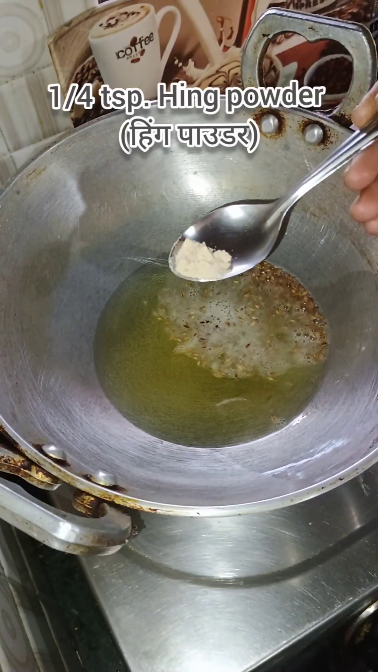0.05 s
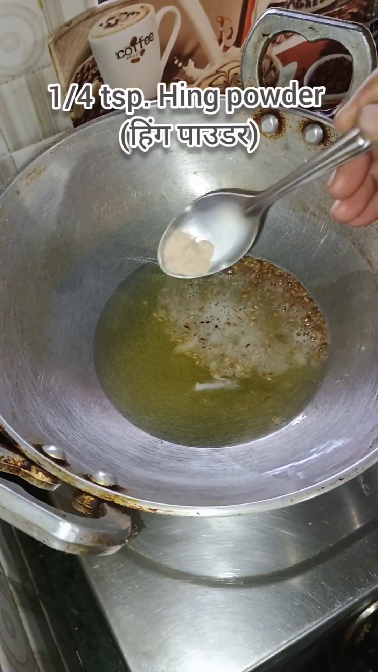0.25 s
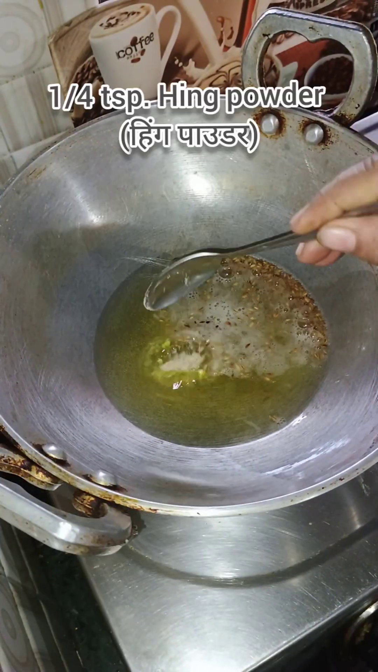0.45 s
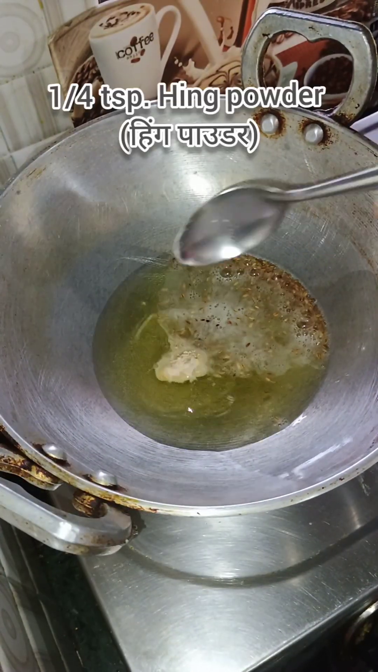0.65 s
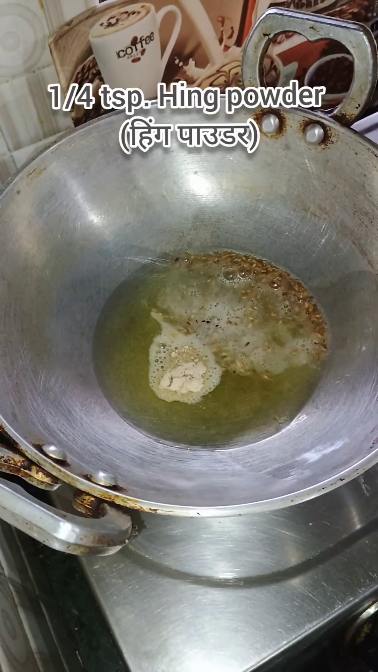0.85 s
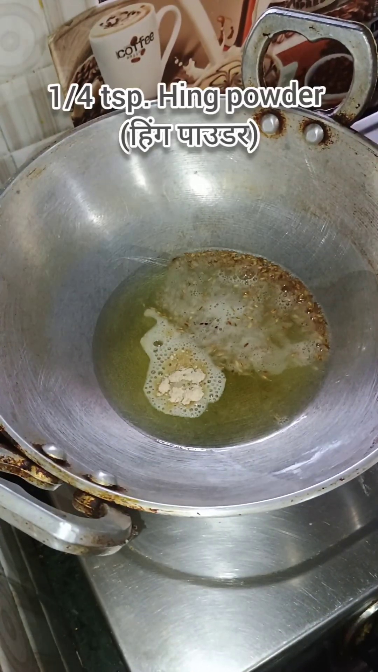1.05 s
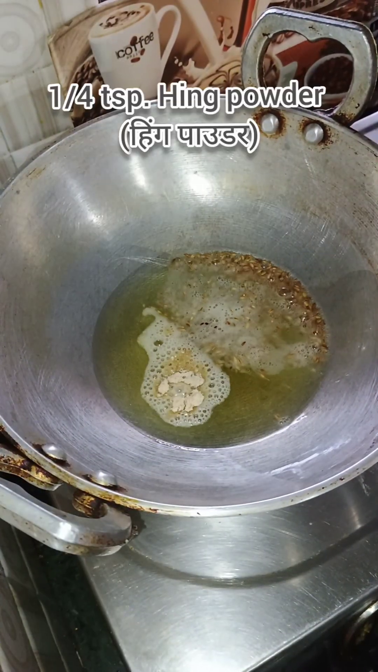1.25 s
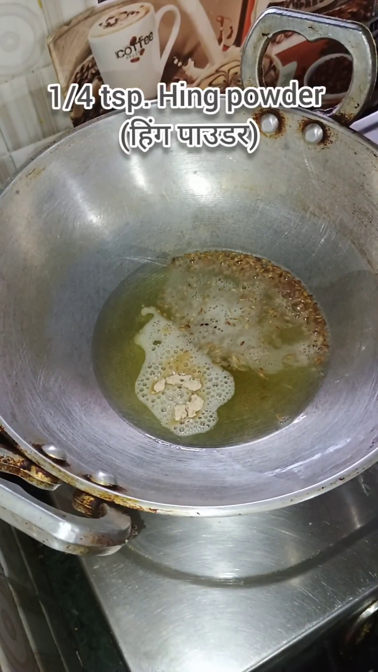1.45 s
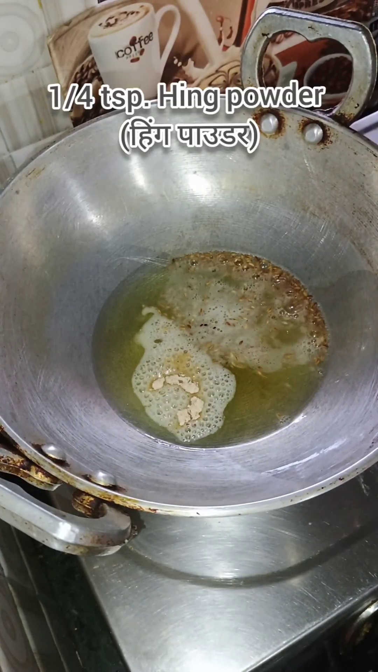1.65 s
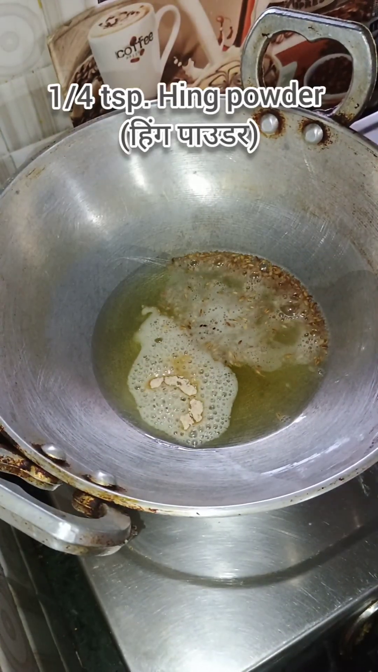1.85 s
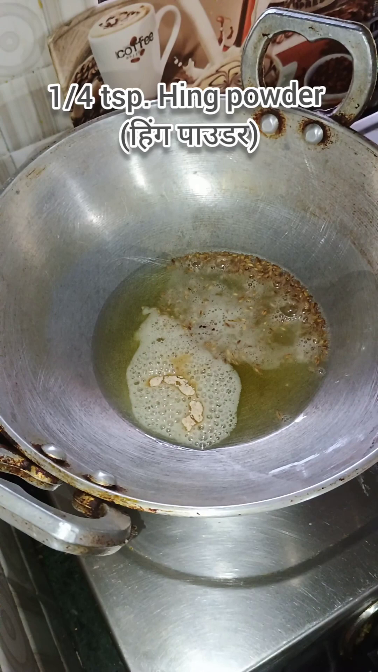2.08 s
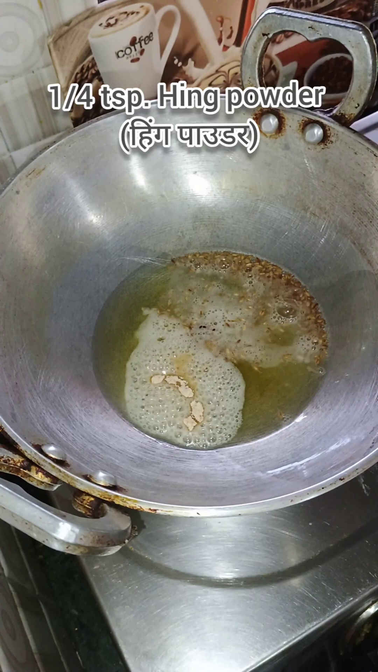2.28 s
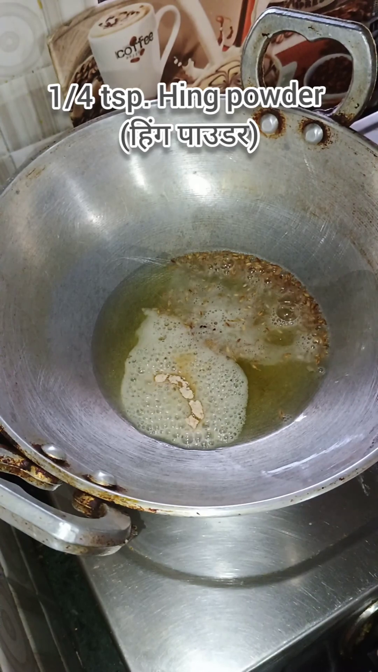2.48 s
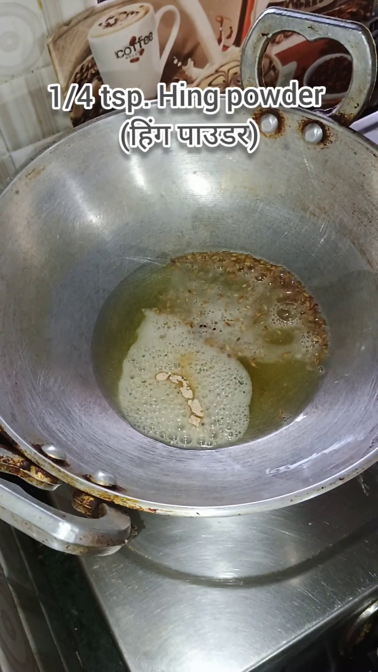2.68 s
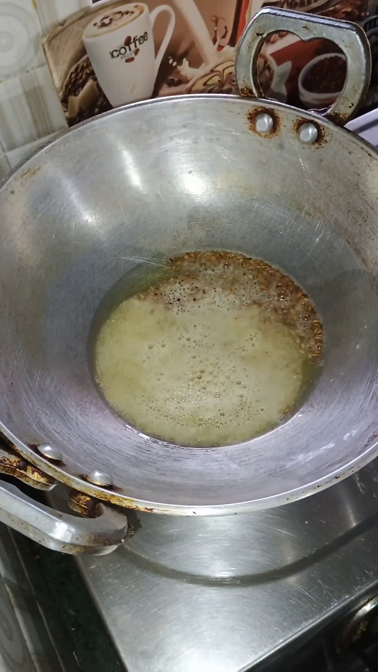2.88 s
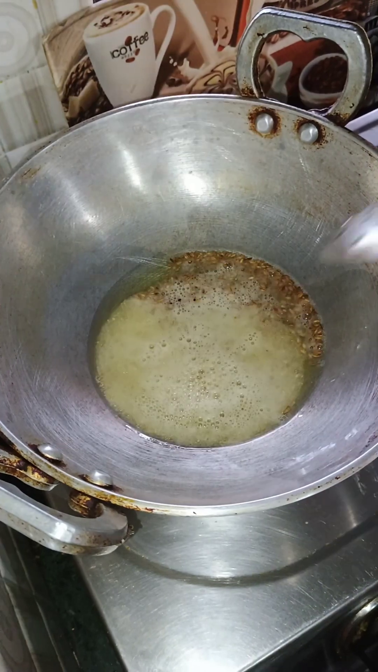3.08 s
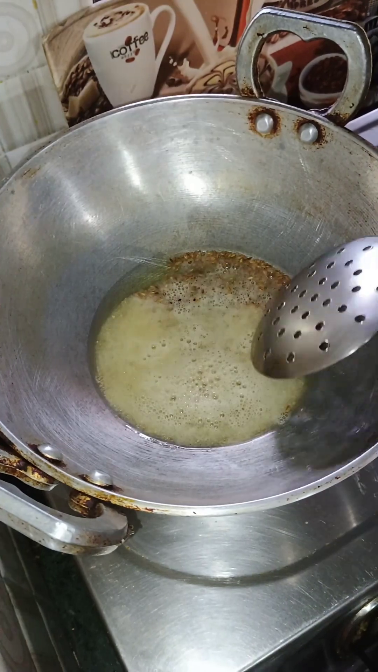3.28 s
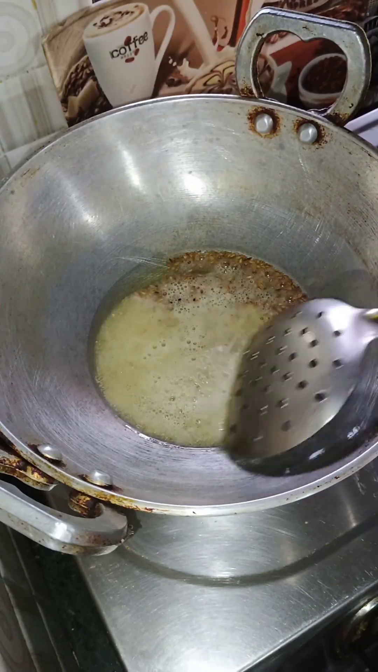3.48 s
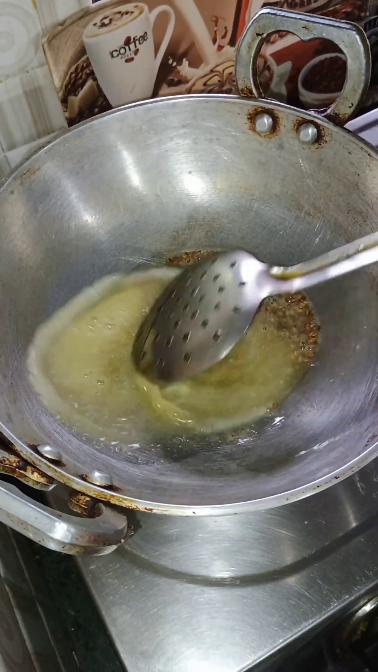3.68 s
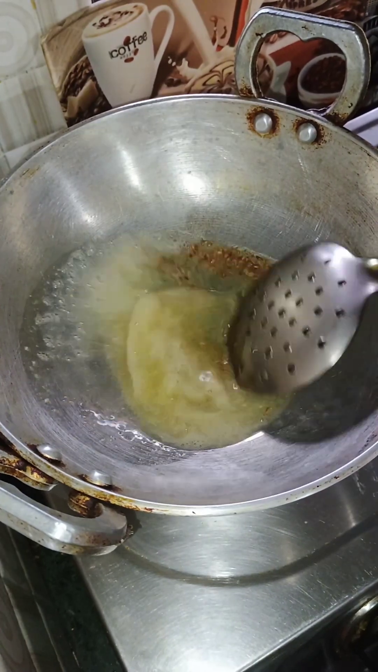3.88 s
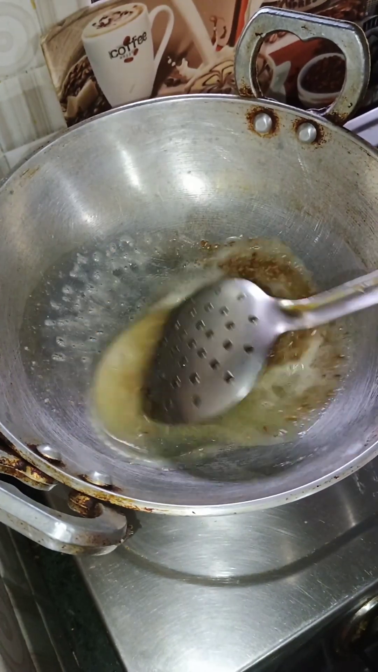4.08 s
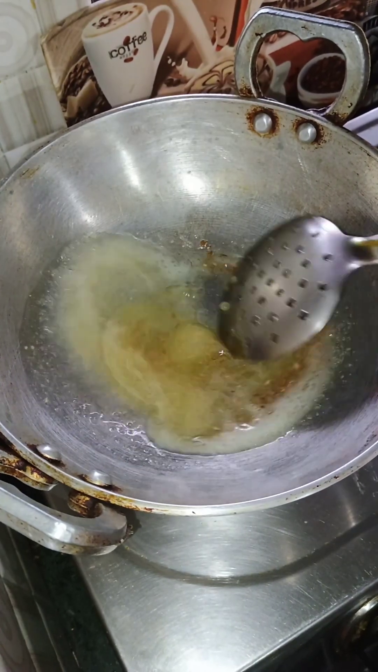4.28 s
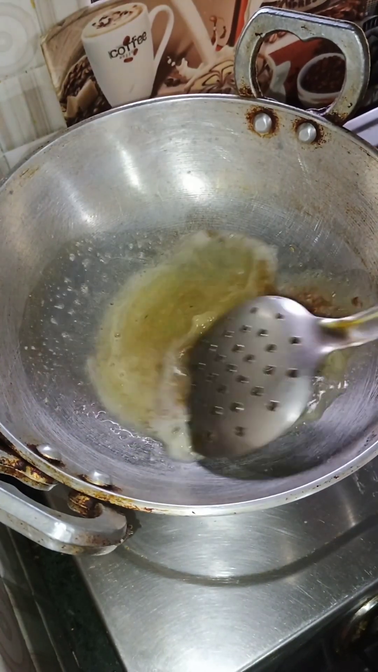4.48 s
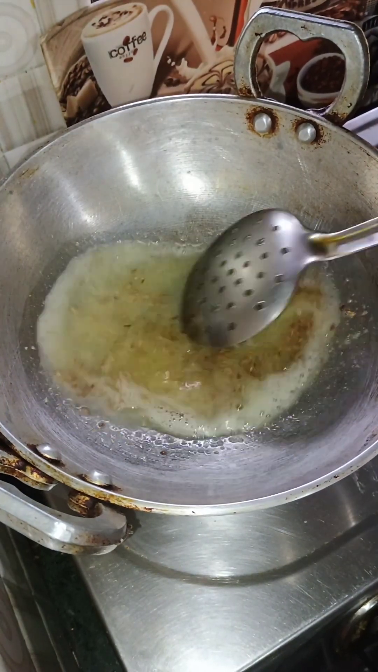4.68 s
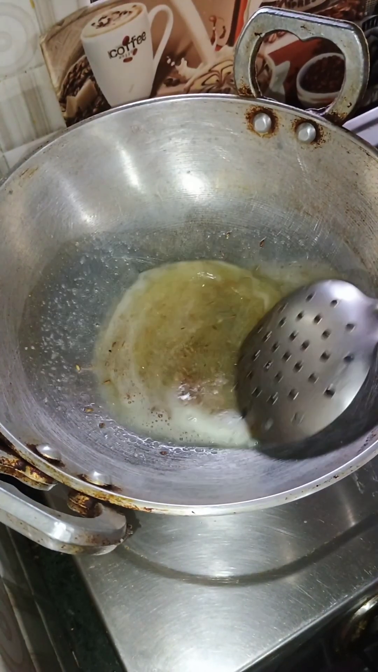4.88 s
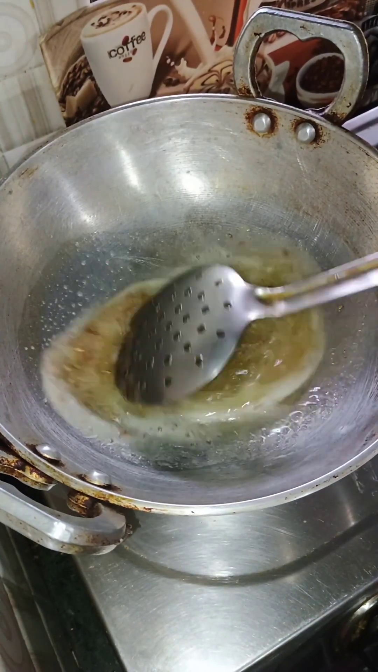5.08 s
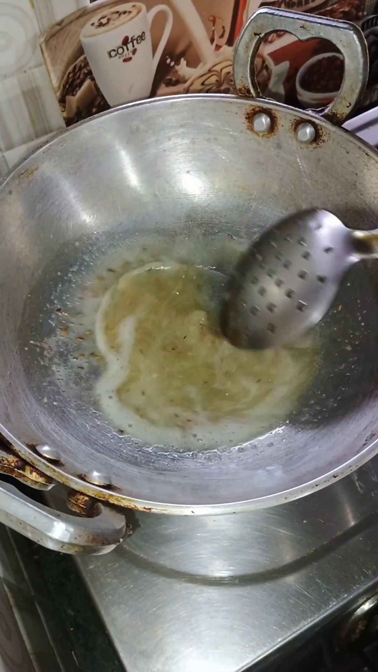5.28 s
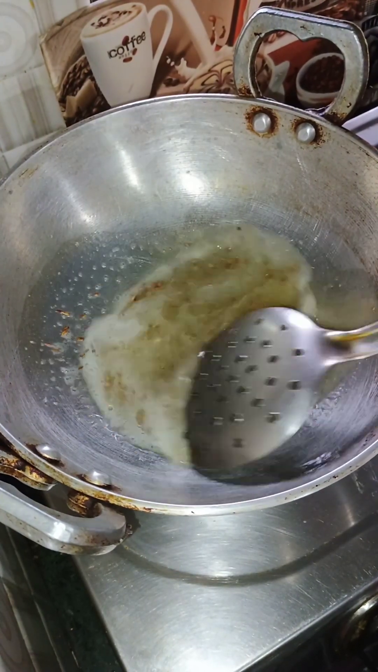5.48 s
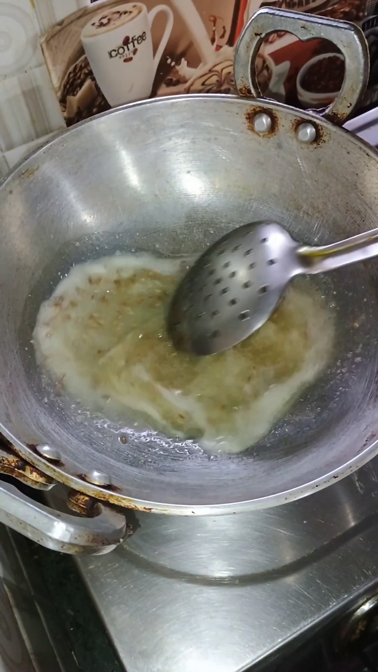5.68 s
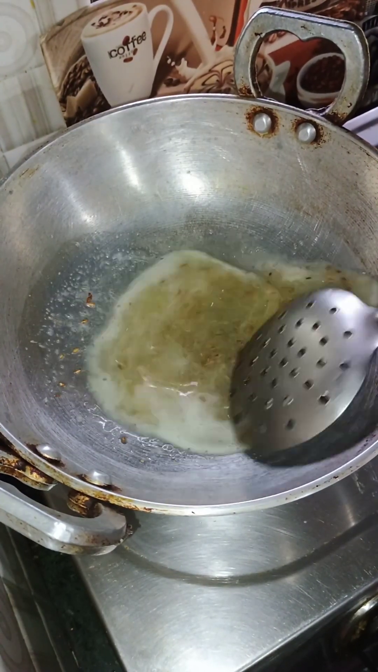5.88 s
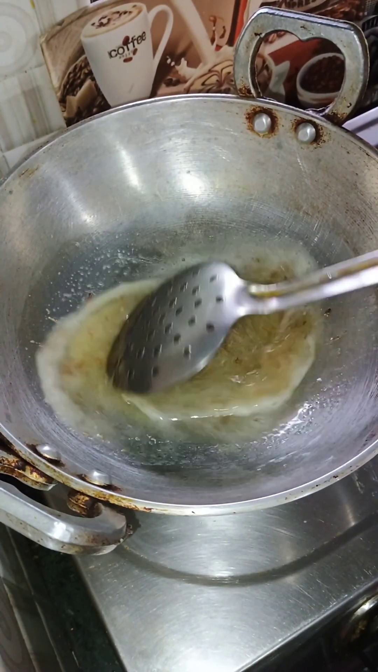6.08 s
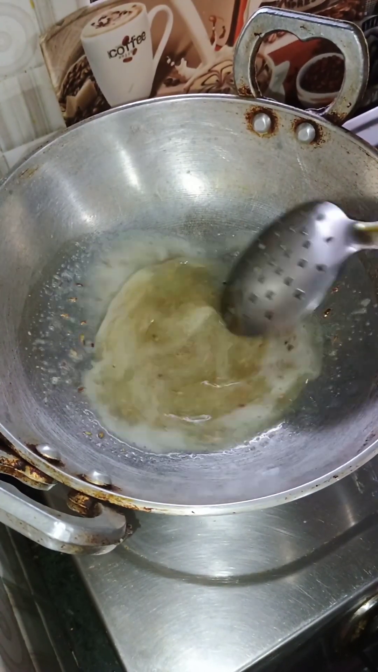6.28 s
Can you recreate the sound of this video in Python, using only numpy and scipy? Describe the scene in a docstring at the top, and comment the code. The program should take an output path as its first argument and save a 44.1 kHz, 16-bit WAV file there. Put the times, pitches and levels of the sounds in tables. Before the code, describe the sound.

Close, quiet foam fizz with sharp oil pops, a brief clatter, then loud crackling sizzle as a metal spoon strikes, rasps and squeaks around a wok.

```python
"""Spices fry in hot oil in a metal wok, close to the microphone in a small, faintly humming kitchen.
At first the foam fizzes: random bubble pings over a hiss. A teaspoon ticks, droplets spit as short pings
with echoes, something shuffles, and utensils clatter down as hollow thuds, noisy clacks and ringing steel.
Then a slotted steel spoon strikes and scrapes the wok: noise bursts and stick-slip jolts ring its
resonances, the edge rasps and squeaks, and the stirred oil sizzles loudly in flaring clumps of bubbles."""
import sys
import numpy as np
from scipy import signal
from scipy.fft import rfft, irfft, next_fast_len
from scipy.io import wavfile
from scipy.ndimage import map_coordinates

SR = 44100
rng = np.random.default_rng(int(sys.argv[2]) if len(sys.argv) > 2 else 0)


def bounce(signal):
    """Save signal as a 16-bit WAV file at the path given by the first command-line argument."""
    frames = np.transpose(np.atleast_2d(signal))
    limited = np.clip(frames, -1, 1)
    pcm = np.round(limited * 32767).astype(np.int16)
    wavfile.write(sys.argv[1], SR, pcm)


N = 279594

# fizz of the resting foam: (time [s], relative level [dB])
SIMMER = [(0.0, -49.5), (0.64, -49), (1.28, -48.5), (1.5, -48), (2.7, -46.5), (2.97, -49.5), (3.46, -51)]
# how much hot metal the stirred oil wets: (time [s], relative sizzle level [dB])
WETTING = [(3.52, -29), (3.55, -18), (3.58, -22.5), (3.83, -17), (3.97, -24), (4.25, -19), (4.33, -25.5),
           (4.52, -18.5), (4.65, -21), (4.74, -17.2), (4.86, -18.5), (4.91, -24), (5.03, -19),
           (5.54, -18.5), (5.59, -19.5), (6.04, -17), (6.27, -22.5), (6.32, -19.5)]
# short pings in the oil, mostly single water droplets bursting; one, at 2.803 s, is a faint bright clack of the
# utensils: (time [s], peak [dB], pitch [Hz], relative bubble body [dB])
POPS = [(1.0056, -23, 6630, -22), (1.1862, -29, 6820, -18), (1.355, -20, 8330, -39),
        (1.4202, -26, 11000, -40), (1.478, -22.5, 7540, 6.5), (1.515, -17.5, 7920, -25),
        (1.6126, -15.5, 6850, -28), (1.7834, -10, 6930, -34), (1.8415, -20.5, 6760, 0),
        (1.9764, -20, 6830, -26), (1.9898, -8, 9300, -26), (2.101, -22.5, 6940, 3.5),
        (2.2711, -7, 6280, -13), (2.2883, -19.5, 6790, 3), (2.3823, -15, 5970, -2), (2.396, -15, 8900, -4),
        (2.4845, -22, 6700, 7.5), (2.559, -19.5, 6600, -13), (2.5812, -20, 5930, -12),
        (2.6728, -30, 9370, -14), (2.7384, -18.5, 6900, -8), (2.803, -26, 4070, -9),
        (3.3482, -29, 6500, -20), (3.6762, -4.5, 5700, -11), (3.8928, -4.5, 4950, -15),
        (4.0238, -7.5, 4670, -10), (4.2436, -6.5, 6920, -21), (4.5144, -3, 5530, -15),
        (4.814, -9.5, 6690, -17), (4.8612, -7.5, 6620, -22), (5.0548, -5.5, 6920, -15),
        (5.688, -7.5, 7305, -16), (5.7707, -5, 6930, -10), (6.2267, -16, 6680, -8),
        (6.2542, -10, 5200, -27)]
# lesser droplets bursting at random: (start [s], end [s], rate [1/s], mean peak [dB])
SPITTING = [(0.998, 2.949, 12, -27.5), (3.592, 6.303, 4, -10.5)]
# the tick as the teaspoon leaves: (time [s], relative level [dB])
TEASPOON = [(0.768, -13.5)]
# utensils on the counter: (time [s], relative thud [dB], thud pitch [Hz], relative clack [dB])
KNOCKS = [(2.822, -41, 121, -26.5), (2.828, -18, 371, -28.5), (2.845, -24.5, 390, -29),
          (2.862, -22.5, 305, -40), (2.882, -26, 324, -37), (2.996, -25.5, 326, -63),
          (3.029, -34, 336, -52)]
# ringing steel of the utensils: (pitch [Hz], relative level [dB], t60 [s])
STEEL = [(495, 5.5, 2.6), (960, 17, 0.46), (1483, 13, 0.57), (1650, 2, 1.6), (2120, -2, .4)]
# a soft shuffle beside the stove: (time [s], relative level [dB], rise [s], fade [s])
SHUFFLE = [(1.328, -43, .022, 0.038)]
# faint hollow tones in the room: (centre [s], pitch [Hz], level [dB], half length [s])
SWELLS = [(0.96, 625, -64.5, .09), (1.497, 1000, -60.5, 0.11), (1.687, 602, -64.5, 0.19),
          (2.2, 440, -54.5, 0.095), (3.426, 452, -56.5, 0.11)]
# the spoon hits the wok: (time [s], relative level [dB])
HITS = [(3.49, -9), (3.953, -10.5), (4.302, -11.5), (4.459, -12), (4.678, -11.5), (5.026, -15.5),
        (5.163, -12.5), (5.246, -14.5), (5.33, -19), (5.469, -17), (5.675, -13), (5.729, -13.5),
        (5.915, -16), (5.962, -15), (6.145, -16.5), (6.199, -18.5)]
# the spoon's edge chatters: (time [s], relative level [dB], pitch [Hz])
SQUEAKS = [(3.904, -19, 2630), (4.1143, -12.5, 1770), (4.1944, -11, 2000), (4.7097, -8.5, 2040),
           (4.7214, -8.5, 2300), (4.78, -17, 1685), (4.9186, -16.5, 1660), (5.127, -11.5, 2710),
           (5.1422, -8.5, 2100), (5.1542, -8, 2080), (5.888, -7, 1660), (5.9178, -11.5, 2070),
           (6.2036, -7.5, 1730)]
# the spoon drags across the bottom: (time [s], length [s], relative boom [dB], groan [Hz])
DRAGS = [(3.495, 0.12, -35.5, 317.6), (3.595, .1, -31, 335), (4.047, 0.11, -31, 343),
         (4.353, 0.095, -39.5, 314), (4.555, 0.035, -32, 326.3), (5.017, 0.093, -36, 353),
         (5.351, .15, -36, 313.3), (5.672, 0.054, -41, 331), (5.928, .17, -38, 338.4)]
# the spoon sweeps up the wall: (time [s], length [s], relative rub [dB], relative edge rasp [dB], squeal [Hz])
SWEEPS = [(3.77, 0.1, -30, -25, 2307), (4.01, 0.14, -30.5, -24.5, 1799), (4.31, 0.12, -33, -29, 2100),
          (4.5, .11, -35.5, -26.5, 2330), (4.68, 0.12, -28.5, -24.5, 1972), (5.02, 0.054, -32, -23, 2510),
          (5.13, 0.15, -39.5, -26.5, 2132), (5.26, 0.1, -28, -25, 2176), (5.44, .06, -33, -30, 1994),
          (5.68, .16, -31.5, -27, 2064), (5.88, 0.16, -34, -30.5, 1823), (6.29, 0.048, -31.5, -29.5, 2450)]
# light contact between strokes: (boom [dB], rub [dB], rasp [dB]), relative
TOUCH_DB = (-44.5, -35, -32)
# the spoon is lifted: (start [s], end [s])
LIFTED_S = (4.89, 5.01)
# the pressing spoon sets off the wok's lowest note: (time [s], relative level [dB], rise [s], t60 [s])
HUM = [(4.38, -50.5, 0.026, 2.9)]
# resonances of the wok's bottom, wall and edge: (pitch [Hz], width [Hz], relative level [dB])
BELLY = [(146.6, 11.3, -14.5), (232, 60, -8), (287, 53, -4.5), (346.4, 4, 3), (399, 22, -3.5)]
WALL = [(524, 34, -1), (572, 8.8, 4), (742, 55, 0), (800, 51, -0.5), (908, 86, 1), (999, 42, 2),
        (1079, 33, -0.5), (1373, 97, 5), (1461, 57, 7)]
EDGE = [(1682, 85, 0), (1835, 80, 1), (2007, 81, -3), (2204, 66, 2), (2390, 140, -5.5), (2657, 320, -3),
        (3550, 100, -4), (4120, 260, -7)]
# spectra of the foam, the fine spray and the larger bubbles: (frequency [Hz], relative density [dB])
FIZZ = [(1500, -54), (2300, -26.5), (3300, -27), (4100, -20.5), (4800, -7), (6000, -7), (6800, -1.5),
        (7600, -8), (9500, -8), (12000, -14), (16000, -20)]
SPRAY = [(1500, -38.5), (4000, -9.5), (5400, -6), (5900, -3.5), (6750, 2), (7500, -6), (9500, -8),
         (12000, -13), (16000, -21)]
SPLUTTER = [(600, -35.5), (2000, -6.5), (3100, -6.5), (4100, -5.5), (4950, 1.5), (5500, -6.5), (6300, -9),
            (9000, -23), (16000, -38)]
# spectra of teaspoon, clacks, shuffle, spoon blows and room: (frequency [Hz], relative density [dB])
TICK = [(300, -30), (1000, -24), (2400, -10.5), (3700, -11.5), (5100, -5), (6000, -3.5), (6750, 2),
        (7600, -9), (9200, -8), (12000, -17), (16000, -27)]
CLACK = [(40, -23), (200, -6), (400, -2), (750, 1), (1150, -3), (1400, -8), (2500, -11.5), (4500, -16.5),
         (10000, -28)]
RUSTLE = [(100, -22), (300, 3), (450, -0.5), (600, -4), (760, 4), (950, -14), (1150, 1.5), (1400, -4.5),
          (2200, -6), (3000, -25), (6000, -50)]
BLOW = [(40, -41), (120, -9), (260, -25), (600, 3), (1000, 6.5), (2500, -12.5), (4500, 2.5), (6800, 3.5),
        (9000, -4.5), (16000, -28)]
KITCHEN = [(15, -49), (25, -45), (76, -1.5), (273, -5), (438, -5), (513, -1.5), (589, -5), (823, -8),
           (1000, -8), (1130, -10.5), (1960, -8.5), (2210, -12.5), (2800, -14), (3640, -35), (6160, -120)]
# stereo image of the metal: (frequency [Hz], left-right correlation [0-1])
ALIKE = [(100, 1), (300, 0.82), (640, 0.58), (1400, 0.47), (3000, 0)]
# stereo balance of the metal: (frequency [Hz], left over right [dB])
LEFT = [(60, -4), (200, 4), (380, 8.5), (700, 6.5), (1290, 2.5), (2380, -1.5), (4400, 4), (15000, 10)]

TOP_HZ = 16000  # band limit of the whole scene
FOAM_DB, SPRAY_DB, SPLUTTER_DB = 3, -1.26, -7  # each layer against its level curve
FLARE_DB, FLARE_RATE = 1.5, 49  # depth of a hot spot's flaring, curve knots a second
CHURN_DB = 3.5  # extra larger bubbles at the hardest sweep
SPIT_HZ, SPIT_SPREAD = 6760, 0.21  # lesser droplets: middle pitch and its log spread
SPIT_SCATTER_DB, SPIT_BODY_DB = 2, -12  # their level scatter and mean bubble body
PRESS_S, RELEASE_S = 0.019, 0.035  # a stroke takes hold and lets go
SKIP_S, SKIP_DB = 0.037, -5.5  # the light contact weakens just before each hit


def amp(db):
    """Decibels to gain."""
    return 10 ** (np.asarray(db) / 20)


def unit(x):
    """Scale to rms 1."""
    return x / np.sqrt(np.mean(x ** 2) + 1e-20)


def along(points, hz):
    """Read a (frequency [Hz], value) curve on a log frequency axis."""
    f, v = np.transpose(points)
    return np.interp(np.log(hz + 1), np.log(f), v)


def gain_curve(points):
    """Turn (time [s], level [dB]) points into a gain per sample."""
    s, db = np.transpose(points)
    return amp(np.interp(np.arange(N) / SR, s, db))


def wobble(rate, size=16):
    """A smooth random curve with rate knots a second, worked out every size samples."""
    at = np.arange(0, N + size, size)
    curve = map_coordinates(rng.standard_normal(4096), [at * rate / SR], mode="wrap")
    return np.interp(np.arange(N), at, curve)


def add(track, s, sound):
    """Mix a sound into a track at time s."""
    part = track[..., round(s * SR):][..., :sound.shape[-1]]
    part += sound[..., :part.shape[-1]]


def filtered(x, response):
    """Shape x with a complex response of frequency, padded to leave room for the tail."""
    size = 2 * next_fast_len((x.shape[-1] + 8192) // 2, True)
    hz = np.fft.rfftfreq(size, 1 / SR)
    return irfft(rfft(x, size) * response(hz), size)[..., :x.shape[-1]]


def colour(x, points):
    """Give x a spectrum with a causal (minimum-phase) filter of unit power gain."""
    def response(hz):
        cepstrum = irfft(np.log(amp(along(points, hz))))
        half = len(cepstrum) // 2
        # folding the cepstrum onto positive time makes the filter causal
        h = np.exp(rfft(2 * cepstrum[:half], 2 * half))
        size = np.abs(h)
        return unit(size) * h / size
    return filtered(x, response)


def resonate(x, modes):
    """Ring a bank of resonances of unit power gain, dark below and above its modes."""
    def response(f):
        h = 0
        for k, (centre, width, db) in enumerate(modes):
            damping = 1j * f * width
            h = h + (-1) ** k * amp(db) * damping / (centre * centre - f * f + damping)
        h = h * (f / (modes[0][0] / 2 + 1j * f)) ** 2
        h = h / (1 + 1j * f / modes[-1][0] / 2)
        return h / np.sqrt(np.mean(np.abs(h) ** 2))
    return filtered(x, response)


def place(pair):
    """Blend two unrelated signals into the left and right sound of the metal."""
    def blend(hz):
        turn = np.arccos(np.clip(along(ALIKE, hz), -1, 1)) / 2
        return np.array([np.cos(turn), np.sin(turn)])

    def balance(hz):
        return amp(np.outer([.5, -.5], along(LEFT, hz)))

    mid, side = filtered(pair, blend)
    return filtered(np.array([mid + side, mid - side]), balance)


def lean(left_db):
    """Gains of the two channels for a given left-over-right level."""
    return amp([[left_db / 2], [-left_db / 2]])


def burst(t60):
    """Two channels of dying noise, each of energy 1."""
    t = np.arange(SR // 2) / SR
    x = rng.standard_normal((2, len(t))) * amp(-60 * t / t60)
    return x / np.linalg.norm(x, axis=1, keepdims=True)


def bowl(left_db, echo_db, echo_t60=0.085, room_db=-13, room_t60=0.75, lag=0.00038):
    """Path from a spot in the oil: direct (left first and louder), echoes inside the wok, then the kitchen."""
    path = amp(echo_db) * burst(echo_t60) + amp(room_db) * burst(room_t60)
    path[0, 0] += 1
    path[1, round(lag * SR * rng.uniform(.5, 1.5))] += .7
    return path * lean(left_db)


def note(hz, rough_rate, drift, shake_db):
    """A rough stereo tone of rms 1 on a fixed or moving pitch; its phase and size shake."""
    phase = 2 * np.pi * np.cumsum(np.broadcast_to(hz, N)) / SR
    channels = []
    for _ in range(2):
        size = amp(shake_db * wobble(rough_rate))
        start = 2 * np.pi * rng.random()
        channels.append(size * np.sin(phase + drift * wobble(rough_rate) + start))
    return unit(np.array(channels))


def stroke(s, length, attack, release):
    """Envelope that rises at time s, holds to the end of its length and dies away."""
    t = np.arange(N) / SR - s
    return np.clip(t / attack, 0, 1) * np.exp(-np.maximum(t - length, 0) / release)


def swelling(t, rise):
    """Envelope that peaks at 1 after the rise time and then dies away."""
    return t / rise * np.exp(1 - t / rise)


def stirring():
    """0 until the spoon lands, then a quick rise to 1."""
    return np.clip((np.arange(N) / SR - HITS[0][0]) / 0.016, 0, 1)


def strokes(starts, lengths, levels_db, touch):
    """Force of the spoon once it has landed: each stroke rises out of the light contact."""
    force = [touch]
    for s, length, db in zip(starts, lengths, levels_db):
        force.append(amp(db) * stroke(s, length, PRESS_S, RELEASE_S))
    return stirring() * np.max(force, axis=0)


def friction(rate, spread_db):
    """Stick and slip: irregular jolts of uneven size, rate a second, scaled to rms 1."""
    slips = (rng.random(N) < rate / SR) * amp(spread_db * wobble(90))
    return unit(slips * rng.standard_normal((2, N)))


def kitchen():
    """Faint room noise with a wavering whine; a few hollow tones swell and fade."""
    t = np.arange(N) / SR
    left, right, shared = colour(rng.standard_normal((3, N)), KITCHEN)
    air = np.array([left, right]) * 1.64 + shared
    air = amp(-71.5) * air * amp(1.5 * wobble(5.06))
    whine = note(1000, rough_rate=40, drift=1.0, shake_db=2.5)
    whine = amp(-70.5 + 2.1 * wobble(9)) * whine
    swells = np.zeros((2, N))
    for s, hz, db, half in SWELLS:
        envelope = amp(db) * np.exp(-((t - s) / half) ** 2)
        swells += envelope * note(hz, rough_rate=80, drift=1.3, shake_db=1.5)
    return air + whine + swells


def bubbles(rate, spread_db, life, count, top_hz=16000):
    """Tiny steam bubbles burst at random, each a damped ping; a few are far larger than the rest."""
    when, pitch, phase, keep = rng.random((count, 4)).T
    size = amp(spread_db * np.clip(rng.standard_normal(count), -3, 2.3))
    size = size * (keep < rate * N / SR / count)  # thins the candidates to the wanted rate
    k = np.arange(160)
    cycles = top_hz * pitch[:, None] * k / SR + phase[:, None]
    pings = np.sin(2 * np.pi * cycles) * np.exp(-k / SR / life)
    at = (when * N).astype(int)[:, None] + k
    return unit(np.bincount(at.ravel(), (size[:, None] * pings).ravel(), N)[:N])


def sizzle(grains, spectrum, hiss_db, left_db):
    """Bubbles at several spots of the bowl, over the hiss of countless smaller ones."""
    near = 0
    for spot in grains:
        near = near + signal.oaconvolve(spot[None], bowl(left_db, echo_db=0), axes=1)[:, :N]
    hiss = unit(rng.standard_normal((2, N)) * lean(left_db))
    return unit(colour(unit(near) + amp(hiss_db) * hiss, spectrum))


def churning():
    """0 to 1: how hard the spoon sweeps through the oil."""
    s, length, _, rasp_db, _ = np.transpose(SWEEPS)
    return strokes(s, length, rasp_db - rasp_db.max(), np.zeros(N))


def resting_foam(count):
    """Foam fizzes: it hisses smoothly at first and crackles once the damp powder has spread."""
    damp = np.interp(np.arange(N) / SR, [.8, 1.5, 2.8, 3.2], [.4, 1, 1, .5])
    crackle = damp * amp(7.2 * damp * wobble(35.24))
    foam = [crackle * bubbles(rate=310, spread_db=2.5, life=0.00021, count=2500) for _ in range(count)]
    return amp(FOAM_DB) * gain_curve(SIMMER) * sizzle(foam, FIZZ, hiss_db=4.0, left_db=13.0)


def stirred_oil(count):
    """Oil over hot metal throws clumps of fine spray and larger bubbles; each spot also flares by itself."""
    clumps = amp(1.8 * wobble(65) + 2.3 * wobble(260))

    def spot(**settings):
        return clumps * amp(FLARE_DB * wobble(FLARE_RATE)) * bubbles(**settings)

    fine = [spot(rate=680, spread_db=3.5, life=0.00034, count=5500) for _ in range(count)]
    large = [spot(rate=230, spread_db=3.0, life=0.0011, count=1800, top_hz=7910) for _ in range(count)]
    spray = amp(SPRAY_DB) * sizzle(fine, SPRAY, hiss_db=-7, left_db=7)
    splutter_gain = amp(SPLUTTER_DB + CHURN_DB * churning() + 0.39 * wobble(30))
    splutter = splutter_gain * sizzle(large, SPLUTTER, hiss_db=1.5, left_db=5.5)
    wetting = gain_curve(WETTING) * amp(.9 * wobble(55))
    return wetting * (spray + splutter)


def oil(count=4):
    """The resting foam gives way to the stirred oil's sizzle when the spoon lands."""
    on = stirring()
    return resting_foam(count) * (1 - on) + stirred_oil(count) * on


def teaspoon():
    """A bright noise tick that dies quickly, with a weaker, longer tail."""
    track = np.zeros((2, N))
    for s, db in TEASPOON:
        add(track, s, amp(db + 14.5) * (burst(0.016) + amp(-3.5) * burst(0.14)))
    return place(colour(track, TICK))


def droplets():
    """The lesser droplets at random times, as rows like those of POPS."""
    rows = []
    for start, end, rate, db in SPITTING:
        chance, scatter = rng.random((64, 2)), rng.standard_normal((64, 3))
        for (when, keep), (size, pitch, body) in zip(chance, scatter):
            if keep < rate * (end - start) / len(chance):
                s = start + when * (end - start)
                hz = SPIT_HZ * np.exp(SPIT_SPREAD * pitch)
                rows.append((s, db + SPIT_SCATTER_DB * size, hz, SPIT_BODY_DB + 4 * body))
    return rows


def pops(rise=0.00026, snap_db=-5.5, spit_db=-14, spit_time=0.0047):
    """Each droplet bursts with a short ping, spits a little steam, and echoes in the wok; the one utensil clack
    among them sounds the same way."""
    track, t = np.zeros((2, N)), np.arange(SR // 100) / SR
    for s, db, hz, body_db in list(POPS) + droplets():
        snap, spit = rng.standard_normal((2, len(t)))
        ping = (np.sin(2 * np.pi * hz * t) + amp(snap_db) * snap) * swelling(t, rise)
        ping = ping + amp(spit_db) * spit * np.exp(-t / spit_time)
        pop = signal.fftconvolve(ping[None], bowl(left_db=7.0, echo_db=-5.0), axes=1)
        body = [(1500, body_db - 29), (2400, body_db + 0.5), (3500, body_db + 2.5)]
        pop = colour(pop, body + [(4800, 5.5), (6800, 6), (10000, 3.0), (16000, -13.5)])
        add(track, s + .0006, amp(db) * pop / np.abs(pop.mean(0)).max())
    return track


def shuffle():
    """A soft rustle beside the stove: filtered friction under a brief envelope."""
    envelope = sum(amp(db) * stroke(s, rise, rise, fade) for s, db, rise, fade in SHUFFLE)
    return place(envelope * colour(friction(rate=1900, spread_db=3), RUSTLE))


def counter(rise=0.0049, room_db=-7):
    """Utensils knock on the hollow counter; the room answers and their steel rings on faintly."""
    thuds, clacks, steel = np.zeros(N), np.zeros((2, N)), np.zeros((2, N))
    t = np.arange(SR) / SR
    for s, thud_db, hz, clack_db in KNOCKS:
        tone = np.sin(2 * np.pi * hz * t) + amp(-14.0) * np.sin(2 * np.pi * 2.0 * hz * t)
        add(thuds, s, amp(thud_db - 3.0) * tone * swelling(t, rise))
        add(clacks, s, amp(clack_db + 20) * (burst(0.16) + amp(1) * burst(0.28)))
    for hz, db, t60 in STEEL:
        drift = np.cumsum(rng.normal(0, 0.029, (2, len(t))), axis=1)
        ring = np.sin(2 * np.pi * hz * t + drift)
        add(steel, KNOCKS[0][0], amp(db - 57.5 - 60 * t / t60) * ring)
    answer = signal.oaconvolve(thuds[None], burst(0.24), axes=1)[:, :N]
    thuds = thuds + amp(room_db) * answer
    return thuds * amp([[3.5], [-5]]) + place(colour(clacks, CLACK) + steel)


def blows(ring_t60=0.057):
    """Each hit is a noise burst that cracks and rings all of the wok's resonances."""
    hits = np.zeros((2, N))
    for s, db in HITS:
        add(hits, s + 0.000986, amp(db) * burst(ring_t60))
    ring = amp(1.5) * resonate(hits, BELLY)
    ring = ring + amp(7.0) * resonate(hits, WALL) + amp(15.5) * resonate(hits, EDGE)
    return place(ring + amp(18.0) * colour(hits, BLOW))


def contact():
    """Light contact wavers in pressure; it weakens as the spoon skips before each hit and is lifted once."""
    t = np.arange(N) / SR
    gaps = [(s - SKIP_S, s) for s, _ in HITS] + [LIFTED_S]
    off = np.max([np.clip((t - start) / 0.0081, 0, 1) * (t < end) for start, end in gaps], axis=0)
    return stirring() * amp(SKIP_DB * off + 0.83 * wobble(12))


def held(starts, hz):
    """Each stroke keeps its pitch until the next begins."""
    return hz[np.maximum(np.searchsorted(starts, np.arange(N) / SR) - 1, 0)]


def scrape():
    """Slips shake the wok's belly and wall, and the spoon's edge rasps; drags groan and sweeps squeal."""
    drag_s, drag_length, boom_db, groan_hz = np.transpose(DRAGS)
    sweep_s, sweep_length, rub_db, rasp_db, squeal_hz = np.transpose(SWEEPS)
    touch = amp(TOUCH_DB)[:, None] * contact()
    boom = strokes(drag_s, drag_length, boom_db, touch[0])
    rub = strokes(sweep_s, sweep_length, rub_db, touch[1])
    rasp = strokes(sweep_s, sweep_length, rasp_db, touch[2])

    belly = amp(-5.0) * resonate(boom * friction(rate=1600, spread_db=3.5), BELLY)
    groan = note(held(drag_s, groan_hz), rough_rate=41, drift=0.94, shake_db=3.5)
    groan = amp(-5) * boom * groan
    # where the spoon touches decides which of the wall's resonances speak most
    wall = 0
    for modes, db in [(WALL[:2], -14), (WALL[2:7], -2.5), (WALL[7:], -4.5)]:
        force = rub * amp(3.05 * wobble(16) + db)
        wall = wall + resonate(force * friction(rate=1500, spread_db=1.5), modes)
    edge = resonate(rasp * friction(rate=1500, spread_db=2.5), EDGE)
    squeal = note(held(sweep_s, squeal_hz), rough_rate=260, drift=2.3, shake_db=-0.5)
    squeal = amp(-9.5) * rasp * squeal
    # dividing t60 by ln 1000 gives the decay time constant
    hum = sum(amp(db) * stroke(s, rise, rise, t60 / np.log(1000)) for s, db, rise, t60 in HUM)
    hum = hum * note(BELLY[0][0], rough_rate=20, drift=1.0, shake_db=0.5)
    return place(belly + groan + wall + edge + squeal + hum)


def squeaks(rise=0.0019):
    """The chattering edge gives brief gritty tones of drifting phase."""
    track, t = np.zeros((2, N)), np.arange(SR // 20) / SR
    for s, db, hz in SQUEAKS:
        drift = np.cumsum(rng.normal(0, .04, (2, len(t))), axis=1)
        tone = np.sin(2 * np.pi * hz * t + drift)
        grit = amp(-7) * resonate(rng.standard_normal((2, len(t))), EDGE)
        add(track, s, amp(db - 2.5) * swelling(t, rise) * (tone + grit))
    # thin out the lows
    return place(filtered(track, lambda f: (f / (500 + 1j * f)) ** 3))


def scene():
    """The room, the oil, the utensils and the stirring spoon together."""
    before = kitchen() + oil() + teaspoon() + pops() + shuffle() + counter()
    return before + blows() + scrape() + squeaks()


def record(dry):
    """Peaks clip at full scale; then nothing is kept above the band limit."""
    return filtered(np.clip(dry, -1, 1), lambda hz: hz < TOP_HZ)


dry = scene()
out = record(dry)
bounce(out)
```